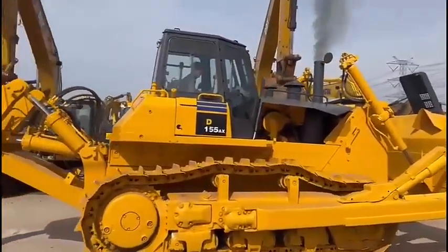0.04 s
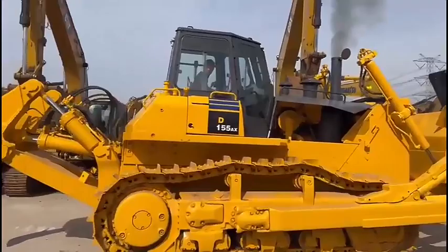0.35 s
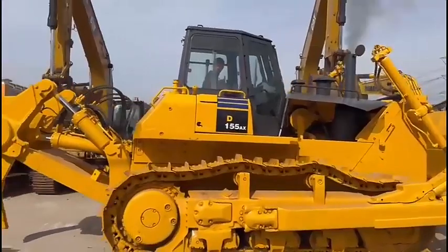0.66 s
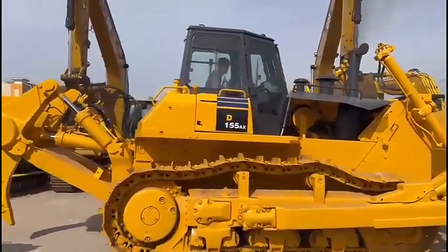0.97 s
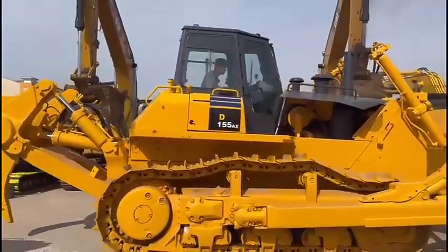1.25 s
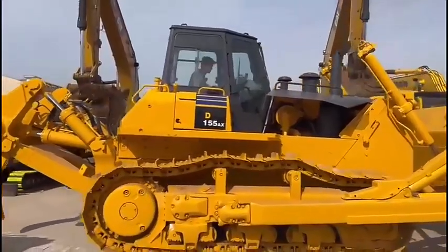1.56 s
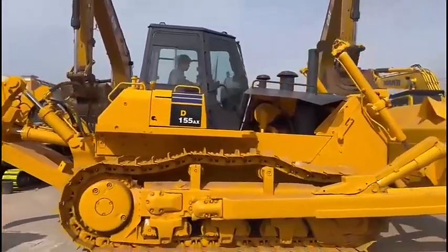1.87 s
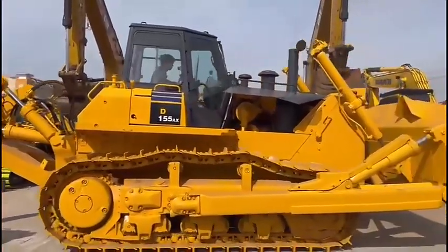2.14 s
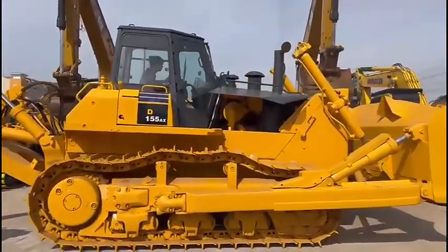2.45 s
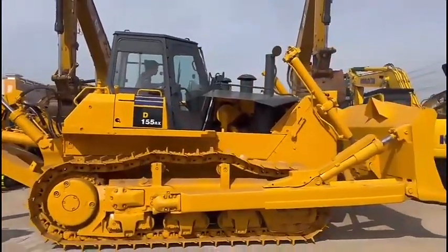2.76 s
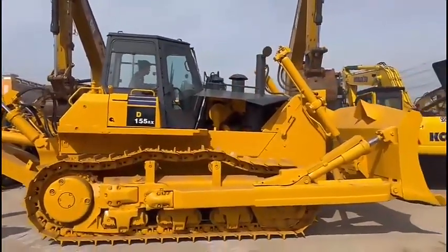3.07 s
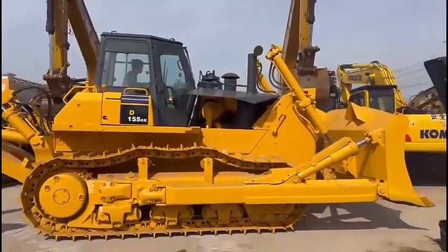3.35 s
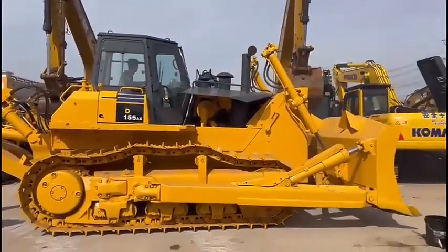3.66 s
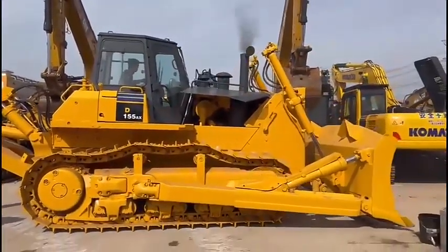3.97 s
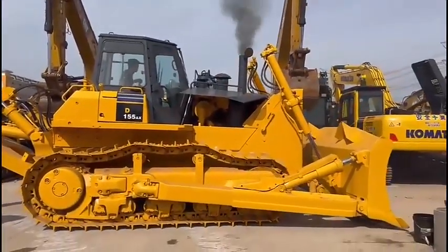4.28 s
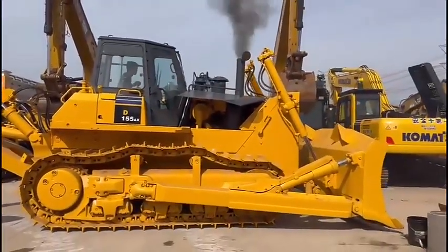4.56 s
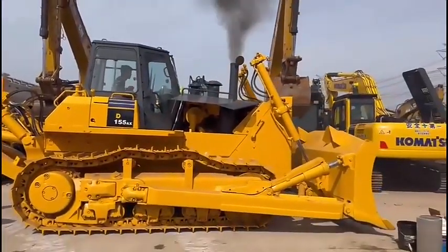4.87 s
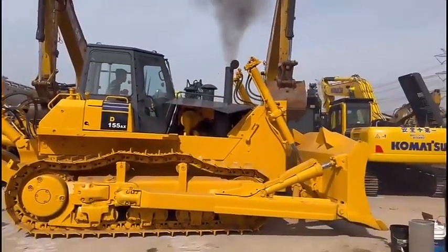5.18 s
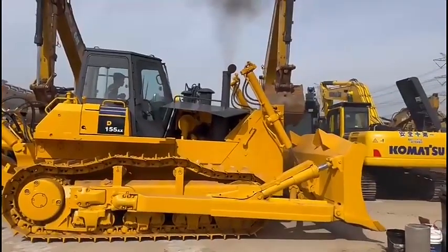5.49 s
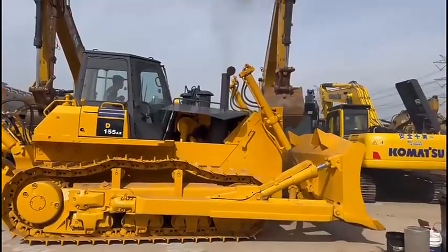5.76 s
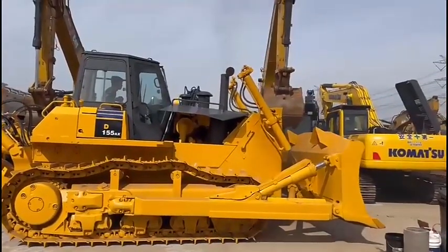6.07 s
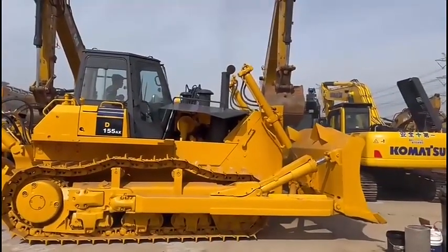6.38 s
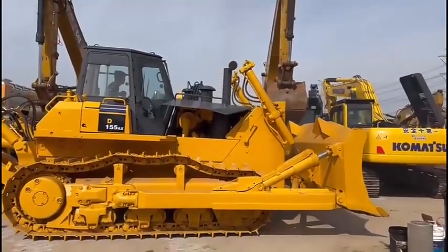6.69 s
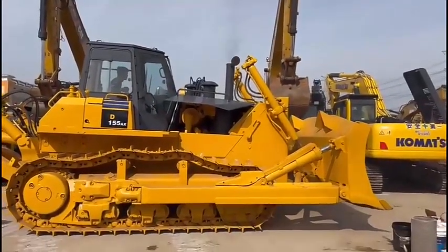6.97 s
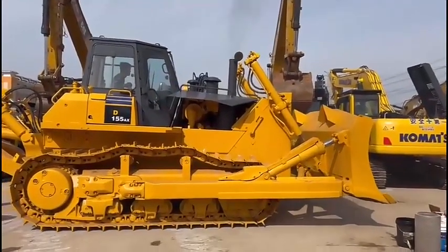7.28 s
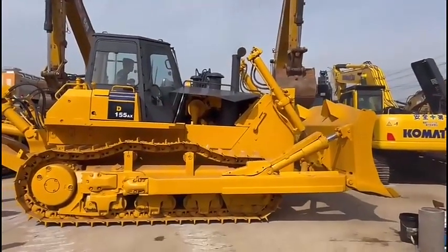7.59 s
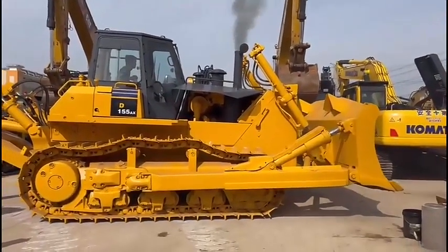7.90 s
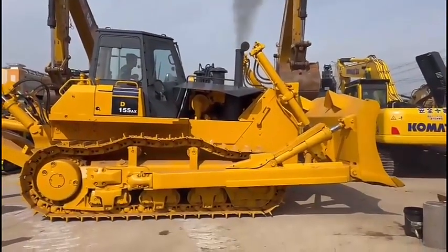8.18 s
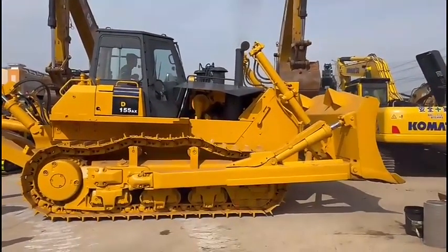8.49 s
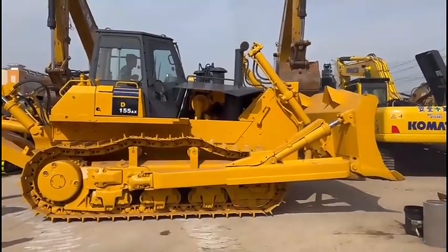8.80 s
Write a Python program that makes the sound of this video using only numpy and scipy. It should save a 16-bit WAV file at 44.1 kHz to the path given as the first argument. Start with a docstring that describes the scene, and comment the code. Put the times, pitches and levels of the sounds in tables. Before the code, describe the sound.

A large diesel bulldozer crawls along with its engine booming and clattering, steel track shoes clanking, dry joints squeaking and rollers grinding. The tracks fall quiet as it stops and the engine sinks towards idle. It then revs up hard, with one more squeaky clank, holds high, dips and climbs again, with fan rush and gear whine following the speed. Heard in stereo from a few metres to the side in an open yard.

```python
"""An open yard, a stereo microphone a few metres to the side of a six-cylinder diesel crawler dozer.
It rolls to a halt: track shoes clank, dry joints squeak, rollers grind along the chains.
The engine sinks towards idle and is revved up again and again. The exhaust booms while fuel is on and
goes slack when it is cut; combustion clatter, fan rush, gear whine and hydraulic pump follow the crank."""
import sys
import numpy as np
from scipy import signal
from scipy.fft import rfft, irfft, next_fast_len
from scipy.io import wavfile
from scipy.ndimage import uniform_filter1d, map_coordinates

SR = 44100
rng = np.random.default_rng(int(sys.argv[2]) if len(sys.argv) > 2 else 0)


def transcribe(signal):
    """Save signal, clipped to [-1, 1], as a 16-bit WAV file at the path in sys.argv[1]."""
    frames = np.atleast_2d(signal).T
    limited = np.clip(frames, -1, 1)
    pcm = np.round(limited * 32767).astype(np.int16)
    wavfile.write(sys.argv[1], SR, pcm)


N = 398663
FULL_FIRING_HZ, MIC_LIMIT_HZ = 75.6, 15550
LEFT_RIGHT = np.array([[.5], [-.5]])  # shares a difference between the channels

# engine speed: (time [s], firing rate [Hz])
FIRING_RATE = [(0, 56.04), (.59, 63.35), (1.1, 67.73), (1.38, 67.57), (1.7, 49.8), (1.96, 49.17),
               (2.3, 55.2), (2.52, 54.83), (2.68, 48.06), (3.15, 35.5), (3.5, 30.45), (3.71, 33.66),
               (4, 43.52), (4.74, 63.26), (5.2, 72.83), (5.6, 75.54), (6.66, 75.5), (6.81, 69.84),
               (7.08, 72.9), (7.25, 64), (7.45, 56.97), (7.63, 53.84), (7.98, 64.3), (8.33, 69.84),
               (9.04, 73.1)]
# throttle moves, each held until the next: (time [s], fuel [dB re full throttle])
THROTTLE_MOVES = [(0, -1), (1.39, -16.5), (1.65, -5), (2.52, -25), (3.17, -13), (3.44, -14), (3.72, -3),
                  (3.88, -1.5), (6.69, -6), (6.93, 1), (7.11, -16), (7.59, -1.5), (7.72, 0)]
# silencer and stack, whose resonances the exhaust harmonics sweep through: (frequency [Hz], gain [dB])
STACK_GAIN = [(30, -46), (37, -25), (48, -17.5), (57, -12.5), (63.3, -20), (67.5, -13), (72, -17),
              (76, -16.5), (85, -20), (105, -31), (118, -25), (139, -13), (152, -22), (175, -35),
              (205, -20.5), (225, -23.5), (255, -32.5), (300, -24), (330, -34), (380, -41)]
# slow swell of the engine noise: (time [s], clatter [dB], hiss [dB], gear whine [dB])
ENGINE_SWELL = [(0, -3.5, 0, -6), (1.3, -6, -3, -3), (2.2, -2.5, -2, 0.5), (3.25, -1.5, -1, 0.5),
                (3.8, 1.2, 0.5, 0), (5.4, 0.8, 0.5, 5), (6.9, 0, 0.63, 0.5), (8.1, 1, 1.6, 1.5),
                (9.04, 1.5, 2.1, 0)]
# colour of the block's clatter: (frequency [Hz], level [dB])
BLOCK_COLOUR = [(25, -31), (48, 3.5), (95, 7), (170, 4), (260, -1), (450, 0), (700, -3.5), (1000, -4.5),
                (1250, -5.5), (1500, -8), (1900, -15), (2300, -16.5), (2800, -34), (6000, -76.5)]
# colour of the hiss as heard, with a dip near 11 kHz: (frequency [Hz], level [dB])
HISS_COLOUR = [(1000, -30), (2000, -2.5), (2900, 0.3), (4200, -.3), (5300, -1.2), (7000, -5.3),
               (8600, -4.8), (9700, -9), (11200, -17), (13300, -11.5), (15500, -12)]
# resonances of the engine casings: (frequency [Hz], width [Hz], gain [dB])
CASING_MODES = [(933, 170, -1.5), (1415, 15, 5), (2230, 1240, 1.5), (3403, 48, 4.5)]
# blows on the engine covers: (place in the six-firing cycle [0-1], pitch [Hz], relative level [dB])
COVER_BLOWS = [(.19, 1428, -28.5), (.33, 890, -34), (.37, 1455, -35), (.65, 895, -27.7), (.74, 1005, -32.5),
               (.73, 815, -32.5)]
# the block's ring under hard combustion: (frequency [Hz], width [Hz], gain [dB])
BLOCK_MODES = [(895, 190, 0)]
# timing gears: (teeth [per turn], relative level [dB])
GEAR_MESHES = [(35, -38), (47, -41.5), (55, -39.5)]
# resonances of the gear case: (frequency [Hz], width [Hz], gain [dB])
GEAR_CASE_MODES = [(630, 70, -8), (880, 70, -5.5), (1075, 90, -1), (1387, 62, -1)]
# lesser tones of the crank: (order [cycles per turn], level at full speed [dB])
CRANK_ORDERS = [(4, -30.5), (18, -46.5), (40, -54), (57, -53)]
# resonances of the hydraulic lines: (frequency [Hz], width [Hz], gain [dB])
HYDRAULIC_MODES = [(146, 35, -7), (201, 20, 0)]
# shoes dropping on rollers and sprocket, and last a gritty burst as a dry joint slips at 4.25 s: (time [s],
# relative level [dB], relative scrape [dB], t60 [s])
SHOE_DROPS = [(0.193, -19, -9.5, 0.17), (0.215, -21, -7, 0.3), (0.257, -22, -5.5, 0.17),
              (0.274, -29, -13, 0.12), (0.428, -22, -5.5, 0.31), (0.458, -22, -4.5, 0.18),
              (0.533, -24, -6, 0.17), (0.617, -21.5, -20, 0.42), (0.659, -14.5, -30, 0.27),
              (0.981, -13, -12.5, 0.28), (1.02, -17, -24, 0.15), (1.171, -22, -31, 0.35),
              (1.306, -9.5, -26, 0.2), (1.338, -15, -30, 0.17), (1.412, -18.5, -6, 0.15),
              (1.489, -17, -33, 0.3), (1.632, -15, -21, 0.22), (1.818, -20.5, -27, 0.16),
              (1.998, -17, -33, 0.12), (2.043, -16, -33, 0.2), (3.516, -24, -28, 0.15),
              (4.246, -22, -6, 0.28)]
# colour of a shoe's clunk: (frequency [Hz], level [dB])
SHOE_COLOUR = [(150, 4), (350, -4.5), (600, 5), (850, 3.5), (1200, 1.5), (1700, -11), (2500, -11),
               (4000, -45), (9000, -73)]
# colour of the scrape as heard: (frequency [Hz], level [dB])
SCRAPE_COLOUR = [(800, -20), (1500, 6), (2000, 1), (2800, 5), (4200, 3), (6500, 0), (8800, -3),
                 (11200, -12), (14000, -4)]
# dry steel joints slipping:
# (time [s], length [s], pitch [Hz], slide [Hz], relative level [dB], overtone step [dB], waver [Hz])
JOINT_SLIPS = [(.205, .035, 2770, 0, -31, -9, 25), (.208, .022, 1590, 0, -29, -20, 50),
               (.207, .035, 8270, 0, -37, -20, 90), (.255, .032, 1610, 0, -26, -12, 45),
               (.257, .03, 2370, 0, -30, -14, 40), (.262, .025, 2790, 0, -31, -14, 35),
               (.275, .05, 6000, 0, -45, -24, 80), (.382, .055, 1330, -70, -27, -17, 75),
               (.365, .05, 4020, -120, -43, -24, 50), (.432, .15, 5850, 0, -37, -24, 95),
               (.455, .04, 8250, 0, -40, -24, 70), (.468, .035, 5860, 0, -32, -27, 110),
               (.598, .028, 5860, 0, -34, -27, 110), (.62, .075, 5850, 0, -42, -27, 130),
               (1.275, .035, 6850, 0, -45, -18, 90), (1.412, .026, 3100, -40, -31, -16, 95),
               (1.437, .059, 1290, 0, -31, -20, 90), (1.672, .066, 1560, 50, -27.5, -26, 65),
               (1.68, .055, 4700, 130, -43, -24, 60), (1.822, .09, 3520, 0, -44.5, -20, 60),
               (2.008, .05, 5280, 0, -45, -22, 70), (2.172, .046, 5340, 0, -49, -20, 70),
               (4.249, .04, 1755, -55, -25, -7, 55), (4.251, .022, 3450, -40, -26.5, -22, 110),
               (4.268, .07, 3430, -40, -35, -22, 70), (4.25, .016, 5230, -60, -30, -24, 150),
               (4.245, .02, 8700, 0, -38, -24, 200), (4.28, .055, 1715, -30, -33.5, -4, 40)]
# rollers grinding along the chains: (time [s], level [dB])
ROLLER_LEVEL = [(0, -32), (.7, -29.5), (1.4, -29.5), (1.9, -33.5), (2.35, -35.5), (2.8, -44.5), (3.3, -63)]
# colour of that grinding: (frequency [Hz], level [dB])
ROLLER_COLOUR = [(40, -20), (150, 4), (330, 0.5), (480, -0.5), (640, 0.5), (1200, -4.5), (1550, -7.5),
                 (1750, -31), (2400, -22), (3500, -54), (8000, -73)]
# decay of the yard's echo: (frequency [Hz], t60 [s])
YARD_DECAY = [(100, .25), (1000, 0.2), (4000, 0.16), (12000, 0.079)]
# likeness of the two channels: (frequency [Hz], correlation [0-1])
MIC_LIKENESS = [(60, .997), (240, .94), (470, .88), (950, .68), (1900, .66), (3800, .66), (8000, .6),
                (14000, .6)]
# balance at the microphone: (frequency [Hz], left minus right [dB])
MIC_BALANCE = [(60, 2.5), (110, 0), (200, 3), (380, 0), (700, 0), (1280, 0), (2370, -0.5), (4380, 2.5),
               (8080, 1), (14900, 0)]
# lead of the left microphone port: (frequency [Hz], phase [rad])
MIC_LEAD = [(0, 0), (300, .05), (1200, .2), (3000, .6), (6000, .6), (9000, 1), (15000, .7)]


def exhaust(firings, firing_hz, speed_db, load_db):
    """Gas pulses leave the silencer as five harmonics; without fuel the boom collapses and stumbles."""
    speedup = np.maximum(np.gradient(firing_hz) * SR, 0)  # Hz/s: the engine works hardest speeding up
    boom_db = load_db + .0542 * speedup
    overtone_db = .75 * amp(speed_db) * load_db + .1274 * speedup
    slack = np.clip(1 - amp(np.minimum(load_db, 2 * speed_db + 2.5)), 0, 1)  # low fuel or low speed
    out = np.zeros(N)
    for k in range(1, 6):
        pulse_db = 1.16 * speed_db - 6 * np.log2(k) + (boom_db if k == 1 else overtone_db)
        uneven_db = (.55 * k + 1.5 * slack) * wobble(13)
        angle = 2 * np.pi * (k * firings + .09 * slack * wobble(22))
        out += amp(pulse_db + along(STACK_GAIN, k * firing_hz) + uneven_db) * np.sin(angle)
    return np.sqrt(2) * out


def throttle(slew_s=.15):
    """Fuel in dB: the rack slews to each new setting and holds it."""
    times, fuel_db = np.transpose(THROTTLE_MOVES)
    return eased(fuel_db[np.searchsorted(times[1:], np.arange(N) / SR)], slew_s)


def combustion_clatter(firings, speed_db, load_db):
    """Each firing knocks the block, over the even rush of the fan."""
    knocks = unit(fan(speed_db) + strokes(firings, cylinder_db=2.5, scatter_db=1.2, fade=1))
    body = lambda hz: amp(along(BLOCK_COLOUR, hz)) * casing(hz)
    # valves and pistons strike at the same crank angles in every cycle of six firings
    place = firings / 6 % 1
    patterns = rng.standard_normal((2, 4096))
    strikes = np.array([map_coordinates(p, [place * (len(p) - 1)], mode="wrap") for p in patterns])
    block = unit(rush(body) + .45 * coloured(strikes, body))
    swell_db, _, _ = curves(ENGINE_SWELL)
    level_db = -24 + 1.29 * speed_db + .13 * load_db + swell_db
    return amp(level_db + .45 * wobble(14)) * knocks * block


def valve_ticks(firings, speed_db, load_db):
    """The valves tick twice to each firing over the rush of the fan, heard as a pulsing hiss."""
    ticks = unit(fan(speed_db) + strokes(2 * firings, cylinder_db=1.5, scatter_db=2, fade=1.8))
    hiss = rush(lambda hz: amp(along(HISS_COLOUR, hz)) * casing(hz))
    _, swell_db, _ = curves(ENGINE_SWELL)
    return amp(-37.5 + speed_db + .093 * load_db + swell_db) * ticks * hiss


def fan(speed_db):
    """The fan's even share of an envelope: it buries single strokes as speed rises."""
    return 4 * amp(.4 * speed_db)


def strokes(count, cylinder_db, scatter_db, fade):
    """A fading burst at each whole count; each of the six cylinders has its own strength."""
    index = count.astype(int)
    strength_db = cylinder_db * np.array([1, -.6, .3, -1, .7, -.4])[index % 6]
    strength_db += scatter_db * rng.standard_normal(2048)[index]
    return unit(amp(strength_db) * np.exp(-fade * (count % 1)))


def casing(hz):
    """Gain of the direct sound plus the ring of the engine casings."""
    return np.sqrt(1 + 2 * ringing(CASING_MODES, hz) ** 2)


def cover_throb(firings, firing_hz, speed_db, rise_s=.005):
    """The hardest blows come at the same crank angles in every cycle and ring the covers in turn."""
    out = np.zeros((2, N))
    swell_db, _, _ = curves(ENGINE_SWELL)
    level_db = 4.2 * speed_db + swell_db
    for place, hz, db in COVER_BLOWS:
        cycle, part = np.divmod(firings / 6 + 1 - place, 1)
        age = part * 6 / firing_hz
        scatter_db, detune, phase, spread = rng.standard_normal((4, 256))[:, cycle.astype(int)]
        angle = 2 * np.pi * hz * (1 + .012 * detune) * age + np.pi * phase + spread * LEFT_RIGHT
        envelope = age / rise_s * np.exp(1 - age / rise_s)
        out += amp(db + level_db + scatter_db) * envelope * np.sin(angle)
    return np.sqrt(2) * out


def lugging(firings, speed_db, load_db):
    """Full fuel at low speed burns harshly, and each firing rings the block."""
    blows = strokes(firings, cylinder_db=1, scatter_db=1, fade=.8) * rng.standard_normal((2, N))
    ring = coloured(blows, lambda hz: ringing(BLOCK_MODES, hz) ** 2)
    slowness = np.clip(2 * (1 - amp(speed_db)), 0, 1)
    return amp(-33.5 + .9 * load_db) * slowness * ring


def drive_whine(turns, speed_db, load_db, pump_order=8):
    """Gears, shafts and pump turn with the crank; gears and pump sing out as they cross a resonance."""
    turn_hz = np.gradient(turns) * SR
    _, _, swell_db = curves(ENGINE_SWELL)
    # the teeth load and unload, and slack gears whine more on the overrun
    mesh_db = 2.2 * wobble(8) - .04 * load_db + swell_db
    gears = sum(crank_tone(turns, teeth, db + mesh_db) * ringing(GEAR_CASE_MODES, teeth * turn_hz)
                for teeth, db in GEAR_MESHES)
    shafts = sum(crank_tone(turns, order, db + 2.2 * speed_db) for order, db in CRANK_ORDERS)
    pump = crank_tone(turns, pump_order, -26 + .9 * speed_db)
    return gears + shafts + pump * ringing(HYDRAULIC_MODES, pump_order * turn_hz)


def crank_tone(turns, order, db):
    """A tone at a multiple of the crank's rate, blurred by backlash."""
    gain = np.sqrt(2) * amp(db + 2.2 * wobble(17))
    return gain * np.sin(2 * np.pi * order * turns + .018 * order * wobble(18))


def track_clanks(rise_s=.002):
    """Each shoe lands with a dense, short steel ring of its own and a gritty scrape; the last row is the
    grating bite of a slipping joint."""
    out, age = np.zeros((2, N + SR)), np.arange(SR // 3) / SR
    grains = amp(2.2 * wobble(243))[:len(age)]
    for start, db, scrape_db, t60 in SHOE_DROPS:
        ripple_db = 6.5 * rng.standard_normal(260)
        modes = lambda hz: amp(np.interp(hz, np.linspace(0, SR / 2, len(ripple_db)), ripple_db))
        bright = min(amp(scrape_db + 4.5), .95)
        # a blunt contact sheds its top octaves
        blunt = lambda hz: amp(2.5 * np.log2(bright) * np.log2(1 + hz / 3000))
        clunk = rush(lambda hz: amp(along(SHOE_COLOUR, hz)) * np.sqrt(modes(hz)), len(age))
        grit = rush(lambda hz: amp(along(SCRAPE_COLOUR, hz)) * modes(hz) * blunt(hz), len(age))
        grit *= np.roll(grains, rng.integers(len(age)))
        envelope = amp(db - 3.3 - 60 * age / t60) * (1 - np.exp(-age / rise_s))
        first = round(start * SR)
        out[:, first:first + len(age)] += envelope * (np.sqrt(1 - bright ** 2) * clunk + bright * grit)
    return out[:, :N]


def joint_squeaks():
    """Stick-slip in dry track joints: short unsteady tones that bite at once, slide and let go slowly."""
    out, harmonic = np.zeros(N), np.arange(1, 9)[:, None]
    waver = wobble(1100)
    chatter = amp(3 * wobble(160.4))
    for start, length, hz, slide_hz, db, step_db, waver_hz in JOINT_SLIPS:
        span = slice(round(start * SR), round((start + length) * SR))
        progress = np.linspace(0, 1, len(waver[span]))
        angle = 2 * np.pi * np.cumsum(hz + slide_hz * progress + waver_hz * waver[span]) / SR
        gains = amp((harmonic - 1) * step_db) * (harmonic * hz < MIC_LIMIT_HZ)
        tone = (gains * np.sin(harmonic * angle)).sum(0)
        grip = np.interp(progress, [0, .07, .7, 1], [0, 1, .7, 0])
        out[span] += np.sqrt(2) * amp(db) * tone * chatter[span] * grip
    return out


def roller_grind():
    """The rollers grind unevenly along the chains, fading as the dozer stops."""
    level_db, = curves(ROLLER_LEVEL)
    return amp(level_db + 2 * wobble(45.2)) * rush(lambda hz: amp(along(ROLLER_COLOUR, hz)))


def yard_echo(x):
    """Machines parked around the yard scatter a short echo back to the microphone."""
    hz, t, spectra = signal.stft(rng.standard_normal((2, SR // 2)), SR, nperseg=256)
    decay = amp(-60 * t / along(YARD_DECAY, hz)[:, None])
    _, tail = signal.istft(spectra * decay, SR, nperseg=256)
    delayed = np.pad(x, (400, 0))[None]  # 9 ms
    return signal.fftconvolve(delayed, tail / np.linalg.norm(tail[0]), axes=1)[:, :N]


def rush(colour, size=N):
    """Coloured stereo noise of rms 1."""
    return coloured(rng.standard_normal((2, size)), colour)


def coloured(pair, colour):
    """Two unrelated signals as coloured stereo of rms 1, alike on both channels in the bass."""
    width = lambda hz: np.arccos(along(MIC_LIKENESS, hz)) / 2
    mid, side = filtered(pair, lambda hz: colour(hz) * np.array([np.cos(width(hz)), np.sin(width(hz))]))
    stereo = np.array([mid + side, mid - side])
    return unit(filtered(stereo, lambda hz: amp(along(MIC_BALANCE, hz) * LEFT_RIGHT)))


def ringing(modes, hz):
    """Gain of a few resonances."""
    return np.sqrt(sum(amp(db) ** 2 / (1 + (2 * (hz - centre) / width) ** 2)
                       for centre, width, db in modes))


def filtered(x, response):
    """x through a frequency response."""
    n = x.shape[-1]
    padded = next_fast_len(n + 4096)
    return irfft(rfft(x, padded) * response(np.fft.rfftfreq(padded, 1 / SR)), padded)[..., :n]


def along(points, hz):
    """Read (frequency, value) points on a log axis."""
    freqs, values = np.transpose(points)
    return np.interp(np.log(hz + 1), np.log(freqs + 1), values)


def curves(rows):
    """One value per sample for each column after the time."""
    times, *columns = np.transpose(rows)
    return [np.interp(np.arange(N) / SR, times, column) for column in columns]


def wobble(rate):
    """A smooth random curve, rate knots a second."""
    return map_coordinates(rng.standard_normal(8192), [np.arange(N) * rate / SR], mode="wrap")


def eased(x, seconds):
    """Running mean over a short time."""
    return uniform_filter1d(x, round(seconds * SR), mode="nearest")


def amp(db):
    """Decibels to gain."""
    return 10 ** (np.asarray(db) / 20)


def unit(x):
    """Scale to rms 1."""
    return x / np.sqrt(np.mean(x ** 2) + 1e-20)


def scene():
    """Engine and running gear, from a few metres to the side."""
    firing_hz = eased(curves(FIRING_RATE)[0], seconds=.09)  # the flywheel rounds off changes of speed
    firings = np.cumsum(firing_hz) / SR
    turns = firings / 3
    speed_db, load_db = 20 * np.log10(firing_hz / FULL_FIRING_HZ), throttle()
    boom = exhaust(firings, firing_hz, speed_db, load_db)
    whine = drive_whine(turns, speed_db, load_db)
    squeaks = joint_squeaks()
    tracks = track_clanks() + amp(-1.5) * squeaks + amp(-6.5) * yard_echo(squeaks)
    engine = (boom + whine) * amp(.54 * LEFT_RIGHT)  # a touch left of centre
    engine += cover_throb(firings, firing_hz, speed_db)
    engine += combustion_clatter(firings, speed_db, load_db)
    engine += valve_ticks(firings, speed_db, load_db)
    engine += lugging(firings, speed_db, load_db)
    return engine + tracks + roller_grind()


def record(dry):
    """Sound reaches the left port a little early; the microphone keeps nothing above its band limit."""
    return filtered(dry, lambda hz: (hz < MIC_LIMIT_HZ) * np.exp(1j * along(MIC_LEAD, hz) * LEFT_RIGHT))


dry = scene()
out = record(dry)
transcribe(out)
```